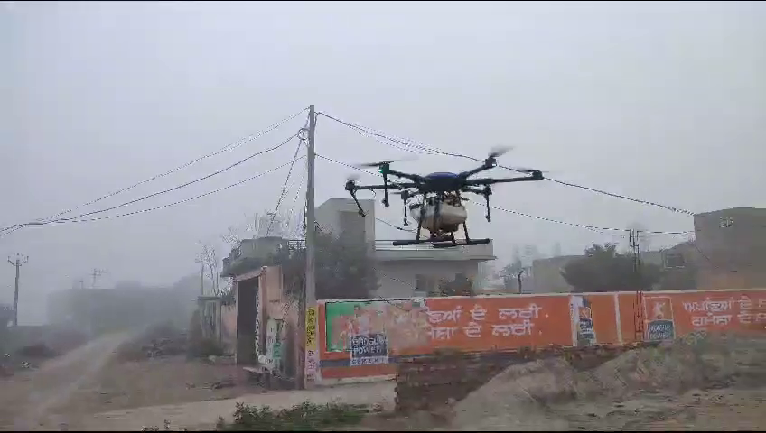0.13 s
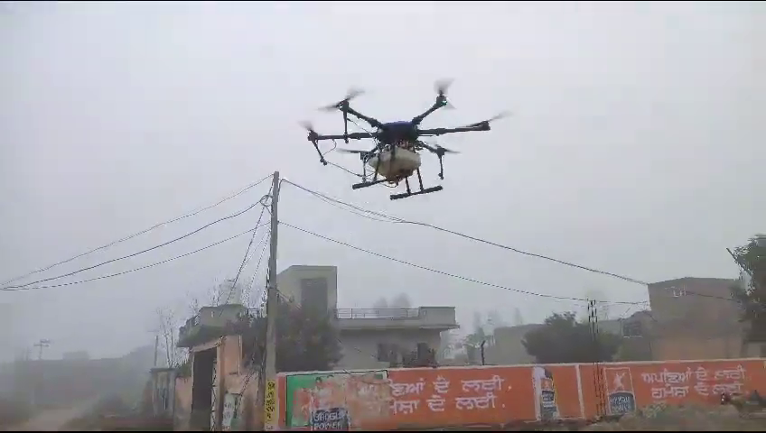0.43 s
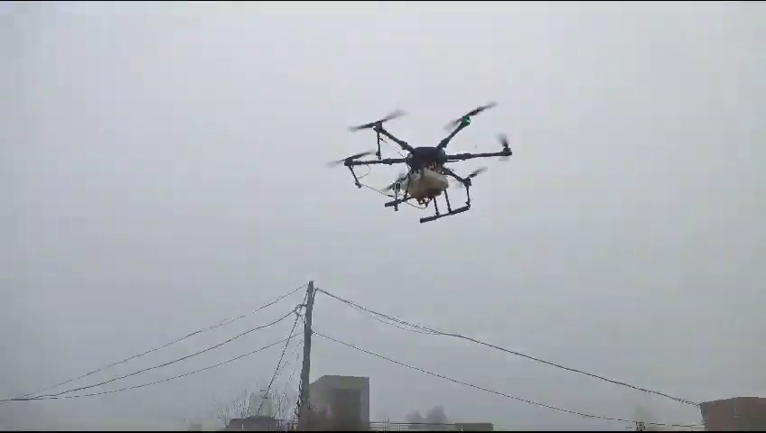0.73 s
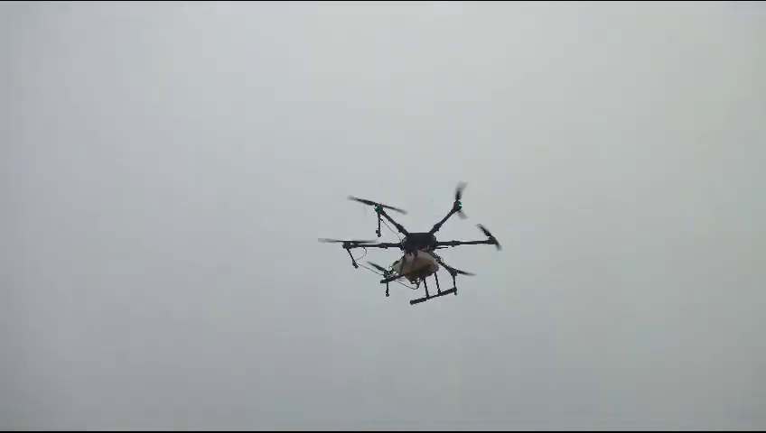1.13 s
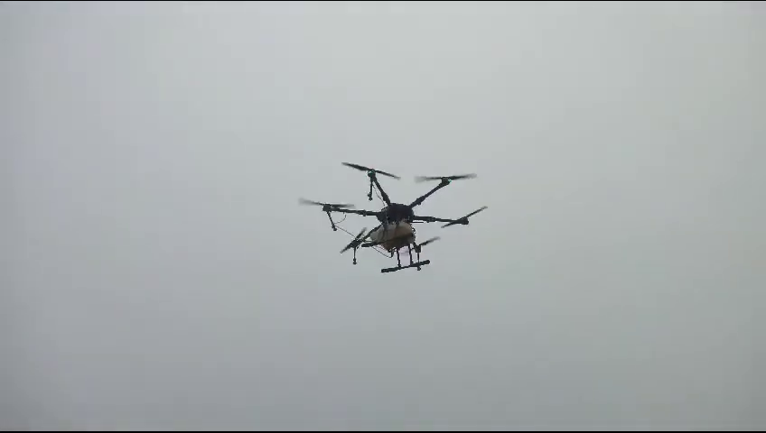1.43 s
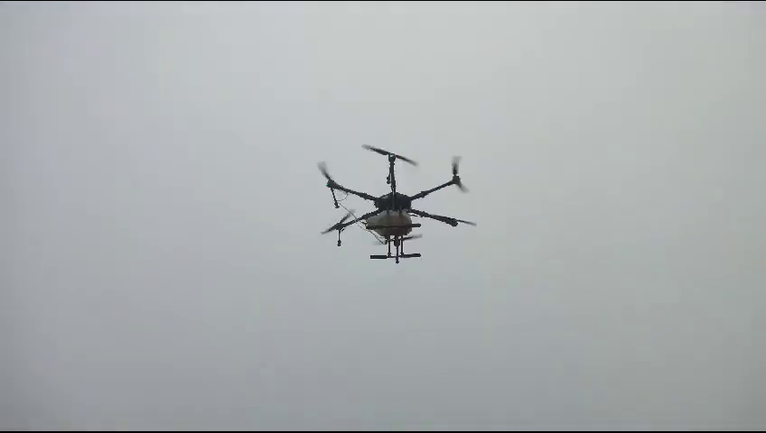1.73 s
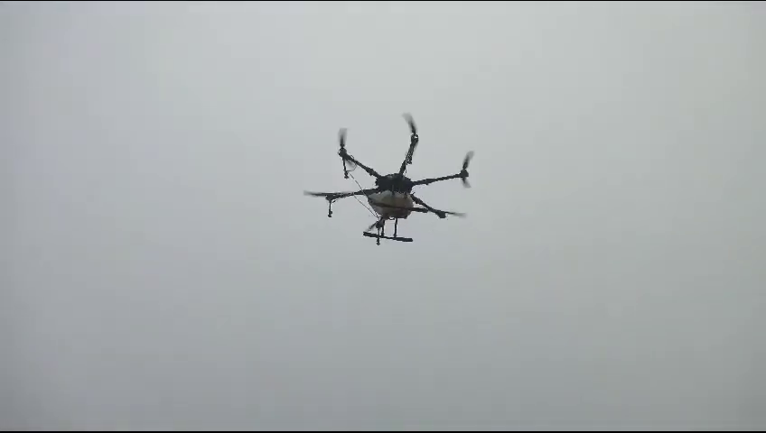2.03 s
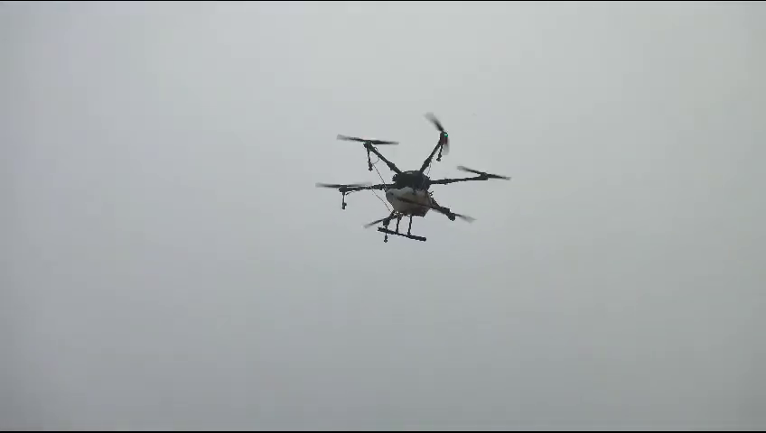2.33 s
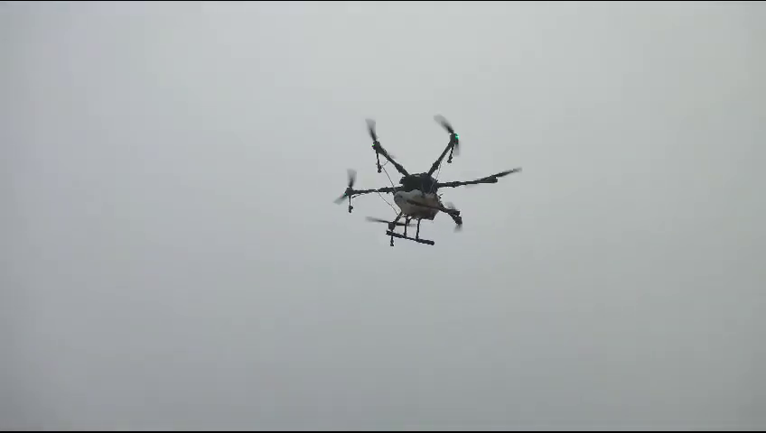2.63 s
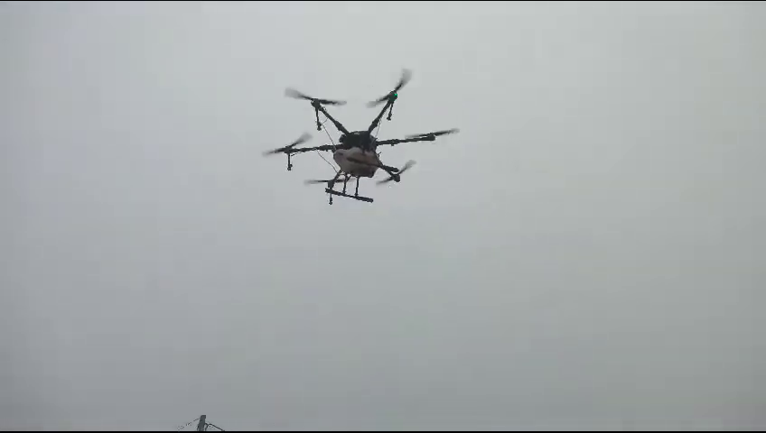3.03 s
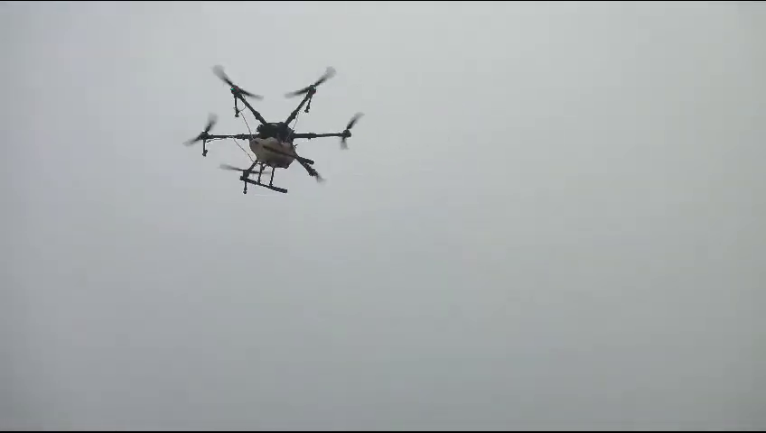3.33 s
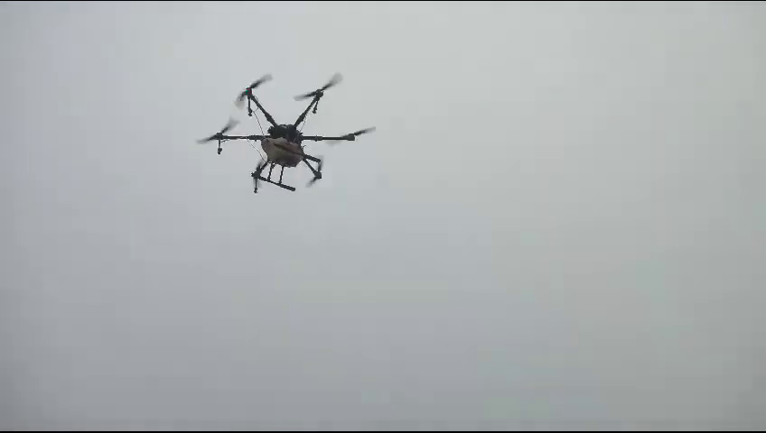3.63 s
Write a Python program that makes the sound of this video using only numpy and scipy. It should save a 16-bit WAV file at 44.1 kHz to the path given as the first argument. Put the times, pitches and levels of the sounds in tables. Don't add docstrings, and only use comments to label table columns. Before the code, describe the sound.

Low beating buzz of a heavy six-rotor drone outdoors, dipping in pitch, then rising into a rough, bright chopping peak near three seconds and easing to a steady hum; faint air hiss and wind on a phone.

```python
import sys
import numpy as np
from scipy import signal
from scipy.fft import rfft, irfft
from scipy.io import wavfile
from scipy.ndimage import uniform_filter1d

SR = 44100
rng = np.random.default_rng(int(sys.argv[2]) if len(sys.argv) > 2 else 0)


def store_pcm(level_fs):
    pcm = np.round(np.clip(level_fs, -1, 1) * 32767).astype(np.int16)
    wavfile.write(sys.argv[1], SR, np.atleast_2d(pcm).T)


def natural_amplitude(level_db):
    exponent = np.asarray(level_db, float) / 20
    return 10 ** exponent


N = 166257
SECONDS = np.arange(N) / SR
LONG = 4096
PASSES = 600

# time_s, blade_rate_hz, hum_db, thump_db, crack_db, swish_db
FLIGHT = [(.1, 129.7, -41.5, -43, -44.5, -53.5), (.3, 119.2, -30.5, -32, -41, -44.5),
          (.56, 101.4, -41, -42, -49, -46.5), (.76, 101.2, -43, -44.5, -46.5, -46.5),
          (.97, 96.76, -41, -44.5, -53, -44.5), (1.15, 110.2, -40, -39, -48.5, -44),
          (1.46, 123.8, -32.5, -40.5, -43.5, -43), (1.66, 122.1, -35.5, -42, -40, -41.5),
          (1.87, 120, -36, -42, -33, -33.5), (2.1, 103.8, -37.5, -36, -33.5, -38.5),
          (2.22, 115.3, -35, -37, -29.5, -34), (2.45, 128.1, -31.5, -37.5, -30, -35),
          (2.62, 129.4, -33.5, -35, -28, -34.5), (2.78, 138.8, -34.5, -22, -24.5, -32.5),
          (2.99, 131.7, -40.5, -30, -22.5, -38.5), (3.22, 129.4, -34.5, -28.5, -28, -37.5),
          (3.4, 127.1, -38.5, -35, -38.5, -43.5), (3.75, 129, -34.5, -41.5, -45, -45.5)]
# time_s, blade_rate_over_leading_pair_hz, level_db, slap_of_second_leading_rotor_db
YAW = [
    (0, 6.5, -10.5, -3),
    (.6, 4, -2.5, 3),
    (1.9, -5, -19.5, -1.5),
    (2.1, -3, -3, -2.5),
    (2.35, -37, -23, -5.5),
    (2.62, -43, -29, -20),
    (2.8, -38, -4, -15),
    (3.0, -23.5, -4, -13.5),
    (3.25, -7, -2.5, -5.5),
    (3.77, -3.5, -5, 5),
]
# frequency_hz, level_db
CRACK = [(400, -23.5), (800, 1.5), (1200, 1), (2100, -1.5), (3000, -13), (5200, -18), (7200, -20.5),
         (9000, -32.5)]


def unit_rms(x):
    return x / np.sqrt(np.mean(x ** 2))


def over_time(table, column):
    rows = np.array(table, float)
    return uniform_filter1d(np.interp(SECONDS, rows[:, 0], rows[:, column]), size=2500)


def colour(x, points, sign=1):
    hz, db = np.array(points, float).T
    bins_hz = np.fft.rfftfreq(LONG, 1 / SR)
    shape_db = np.interp(np.log(bins_hz + 1), np.log(hz), db)
    ceps = irfft(sign * np.log(natural_amplitude(shape_db)))
    ceps[1:LONG // 2] *= 2
    ceps[LONG // 2 + 1:] = 0
    return signal.fftconvolve(x, irfft(np.exp(rfft(ceps))))[:N]


def walk(rate):
    hold = int(SR / rate)
    steps = rng.standard_normal(PASSES)[np.arange(N) // hold]
    return unit_rms(uniform_filter1d(uniform_filter1d(steps, hold), hold))


def bump(at_s, half_s):
    return np.exp(-((SECONDS - at_s) / half_s) ** 2)


def smear(ms):
    tail = rng.standard_normal(LONG) * np.exp(-np.arange(LONG) / SR / (ms * 1e-3))
    return tail / np.sqrt(np.sum(tail ** 2))


def rotor_turns():
    opposed_s = [.02, 0.237, 0.398, 0.599, 0.753, 1.139, 1.31, 1.51, 1.718, 1.97, 2.299, 2.7, 3.14, 3.46,
                 3.72, 4.0]
    mean = np.cumsum(over_time(FLIGHT, 1)) / SR
    beats = np.interp(SECONDS, opposed_s, np.arange(len(opposed_s)) + .5)
    lead = uniform_filter1d(beats, size=3000) / 2
    yaw = mean + np.cumsum(over_time(YAW, 1)) / SR
    gain = natural_amplitude(over_time(YAW, 2))
    apart = 2.5 * SECONDS / 2
    rotors = [(mean + lead, 1), (mean - lead, natural_amplitude(-1.5)),
              (yaw + apart, gain), (yaw - apart + 0.307, gain * natural_amplitude(-0.5))]
    return [(turns + .022 * walk(14), g) for turns, g in rotors]


def hum(rotors):
    # multiple_of_blade_rate, level_db
    overtones = [(.5, -22.5), (1, 1.5), (1.5, -24), (2, -13)]
    total = 0
    for turns, g in rotors:
        for k, db in overtones:
            tone = np.sin(2 * np.pi * k * turns + 0.41 * k * k)
            total = total + g * natural_amplitude(db + 1.2 * walk(4.48)) * tone
    return natural_amplitude(over_time(FLIGHT, 2)) * total


def slaps(rotors):
    # frequency_hz, level_db
    thump_colour = [(130, -28), (240, -0.5), (330, -0.5), (500, 4.5), (650, -3), (900, -14), (2000, -57)]
    jitter_ms, scatter_db, gust_db = 0.03, 1.6, 1.7
    wake_ms, wake_db = 4, 2
    taps = np.arange(-8, 9)
    total = 0
    for (turns, g), db in zip(rotors, (0, over_time(YAW, 3), -6, -6)):
        out = np.zeros(N + LONG)
        chance = rng.standard_normal((2, PASSES))
        at = np.interp(np.arange(PASSES), turns, np.arange(N))
        gusty = g * natural_amplitude(db + gust_db * walk(14))
        size = gusty[at.astype(int)] * natural_amplitude(scatter_db * chance[0]) * (at < N - 1)
        at = np.clip(at + chance[1] * jitter_ms * SR * 1e-3, 20, N)[:, None]
        cells = np.round(at).astype(int) + taps
        offset = cells - at
        np.add.at(out, cells, -size[:, None] * np.sinc(offset) * np.cos(np.pi * offset / 20) ** 2)
        wake = signal.fftconvolve(out, smear(wake_ms))[:N]
        total = total + out[:N] + natural_amplitude(wake_db) * wake
    thump = unit_rms(colour(total, thump_colour)) * natural_amplitude(over_time(FLIGHT, 3) + 0.5)
    crack = unit_rms(colour(total, CRACK)) * natural_amplitude(over_time(FLIGHT, 4) - 1.5)
    return thump + crack


def swish(rotors):
    # frequency_hz, level_db
    hiss_colour = [(150, -2.5), (500, 3), (2100, 3), (3100, -7.5), (5000, -1), (7200, -2.5), (8100, -14.5),
                   (16000, -33.5)]
    # time_s, half_length_s, lift_db
    gusts = [(.31, .08, -0.5), (1.727, 0.037, 1.5), (1.882, 0.084, 1), (2.02, 0.026, 2.5),
             (2.077, .03, -2.5), (2.279, 0.05, 1), (2.342, 0.048, -2.5), (2.48, 0.038, 1), (2.7, 0.036, 0),
             (2.79, .04, 0), (3.057, 0.018, 4.5)]
    flicker_db = 0.24 * walk(12) + sum(db * bump(at, half) for at, half, db in gusts)
    gates = [g * (1 + .1 * np.cos(2 * np.pi * turns)) ** 2 for turns, g in rotors]
    out = []
    for _ in range(2):
        gas = sum(gate * rng.standard_normal(N) for gate in gates)
        hiss = unit_rms(colour(gas, hiss_colour)) * natural_amplitude(over_time(FLIGHT, 5) + 2.5 + flicker_db)
        roar = unit_rms(colour(gas, CRACK)) * natural_amplitude(over_time(FLIGHT, 4) - 10 + flicker_db)
        out.append(hiss + roar)
    return out


def open_air():
    # frequency_hz, level_db
    air_colour = [(20, -25), (70, 2), (160, -17.5), (600, -5), (3000, -39), (8000, -17.5), (13000, -20.5),
                  (16000, -17)]
    hiss = unit_rms(colour(rng.standard_normal(N), air_colour))
    return hiss * natural_amplitude(-46.5 + 0.16 * walk(4.4) - 0.58 * SECONDS)


def wind():
    # time_s, half_length_s, lift_db
    puffs = [
        (.08, .12, 4),
        (0.502, 0.1, 13),
        (.68, 0.12, 11),
        (.95, 0.11, 6),
        (1.6, .3, -7),
        (2.0, .2, -16),
        (2.8, 0.092, 4),
    ]
    sos = signal.butter(2, 45, fs=SR, output="sos")
    puff_db = sum(db * bump(at, half) for at, half, db in puffs)
    ports = []
    for port_db in (3.5, -4):
        rumble = unit_rms(signal.sosfilt(sos, rng.standard_normal(N)))
        ports.append(rumble * natural_amplitude(-53 + port_db + 2.1 * walk(4.4) + puff_db))
    return np.array(ports)


def sings(turns):
    # time_s, half_length_s, multiple_of_blade_rate (whole or half), level_db_rms
    sung = [(0.11, 0.073, 2, -42.5), (.35, 0.085, 4, -54), (0.63, .05, 4, -44), (0.85, 0.045, 5, -48),
            (.8, 0.046, 4, -44), (0.94, 0.061, 4, -43.5), (1.3, 0.087, 4, -47), (1.7, 0.11, 6, -44.5),
            (1.79, 0.14, 9, -39.5), (1.91, .09, 4, -37.5), (1.897, 0.051, 7, -50), (2.05, 0.055, 2, -42),
            (2.32, .07, 7, -47), (2.482, 0.097, 4, -32.5), (2.47, 0.14, 6, -44), (2.648, 0.048, 4, -33.5),
            (2.73, 0.11, 3, -40), (2.795, 0.083, 8, -29), (2.82, 0.12, 10, -31), (2.863, 0.075, 1.5, -38),
            (2.98, .1, 8, -32), (4.2, .05, 11, -29), (3.2, 0.069, 3, -34), (2.79, 0.091, 4, -37),
            (2.83, 0.14, 2, -38), (0.876, 0.078, 2, -45.5), (1.5, .15, 7, -53), (2.8, 0.039, 6, -40),
            (3.0, .08, 5, -40), (3.4, 0.075, 2, -40), (0.28, 0.049, 3, -46), (0.21, 0.086, 5, -40),
            (3.653, 0.052, 3, -38), (3.58, 0.087, 2, -45.5)]
    total = 0
    for at, half, k, db in sung:
        tone = np.sqrt(2) * np.sin(np.pi * np.round(2 * k) * turns)
        total = total + natural_amplitude(db + 1.2 * walk(8.92)) * bump(at, half) * tone
    return total


def snaps():
    # start_s, length_s, level_db
    runs = [
        (2.535, .03, -26),
        (2.712, .045, -30),
        (2.8915, .05, -22),
        (2.969, .025, -22.5),
        (3.0316, .036, -13),
        (3.079, .03, -21),
    ]
    # frequency_hz, level_db
    snap_colour = [(400, -26), (1100, 9), (2200, 3), (3000, -11), (4800, 1.5), (5700, -14), (7200, 1),
                   (8200, -29)]
    out, rate = np.zeros(N), over_time(FLIGHT, 1)
    for start_s, length_s, db in runs:
        rate_hz = rate[int(start_s * SR)]
        passes = np.arange(int(length_s * rate_hz) + 1)
        at = ((start_s + passes / rate_hz) * SR).astype(int)
        out[at] = natural_amplitude(db + 1.51 * rng.standard_normal(len(passes)))
    click = colour(np.arange(N) == 0, snap_colour)
    return signal.fftconvolve(out, click / np.abs(click).max())[:N]


def scene():
    # frequency_hz, level_db
    width = [(60, -24), (130, -26), (250, -15), (700, -10), (1290, -4), (2380, -3), (4400, 0), (15000, 0)]
    # frequency_hz, level_db
    lean = [(60, .4), (200, .5), (700, 1.4), (1290, 3), (2380, 2), (5000, 2.5), (8120, -2), (15000, 6)]
    rotors = rotor_turns()
    drone, blows = hum(rotors), slaps(rotors)
    swish_mid, swish_side = swish(rotors)
    scattered = signal.fftconvolve(blows, smear(9.4))[:N]
    mid = drone + blows + swish_mid + open_air() + sings(rotors[0][0]) + snaps()
    side = colour(.5 * drone + scattered + swish_side + open_air(), width)
    side = side + natural_amplitude(-8) * colour(snaps(), width)
    half_lean = [(hz, db / 2) for hz, db in lean]
    left = colour(mid + side, half_lean)
    right = colour(mid - side, half_lean, sign=-1.38)
    return np.array([left, right]) + wind()


def patchy_treble(x):
    # frequency_hz, level_db
    mic_colour = [(2400, -0.5), (2800, -2), (3700, -2), (4300, 0.5), (7600, 0.5), (8100, -2.5),
                  (8800, -0.5), (14500, -0.5)]
    # frequency_hz, share (0-1)
    holes = [(2400, 0), (3400, .1), (4600, .01), (7500, .01), (8100, .22), (8800, .07), (10500, .14),
             (15800, .07)]
    frame = 384
    hz, _, cells = signal.stft(x, SR, nperseg=frame)
    chance = uniform_filter1d(rng.standard_normal(cells.shape[1:]), size=9, axis=1)
    rank = np.argsort(np.argsort(chance, axis=1), axis=1) / chance.shape[1]
    share = np.interp(hz, *np.array(holes).T)[:, None]
    gain = np.where(rank < share, natural_amplitude(-22), 1)
    swish_db = np.interp(np.arange(cells.shape[2]) * frame / 2, np.arange(N), over_time(FLIGHT, 5))
    busy = swish_db + 12 * chance[0] > -41
    gain = gain * np.where(busy & (hz[:, None] > 15200), 0, 1)
    gain = gain * natural_amplitude(np.interp(hz, *np.array(mic_colour).T))[:, None]
    return signal.istft(cells * gain, SR, nperseg=frame)[1][:, :N]


def roll_off(x):
    return signal.sosfilt(signal.butter(12, 15800, fs=SR, output="sos"), x)


def record(dry):
    start_s, fade_s, first_gain = .0685, 0.045, .3
    fade = np.clip(first_gain + (SECONDS - start_s) / fade_s, 0, 1) * (SECONDS > start_s)
    low_pass = signal.ellip(8, .2, 70, 15800, fs=SR, output="sos")
    mix = signal.sosfilt(low_pass, patchy_treble(dry) * fade)
    return roll_off(mix)


dry = scene()
out = record(dry)
store_pcm(out)
```